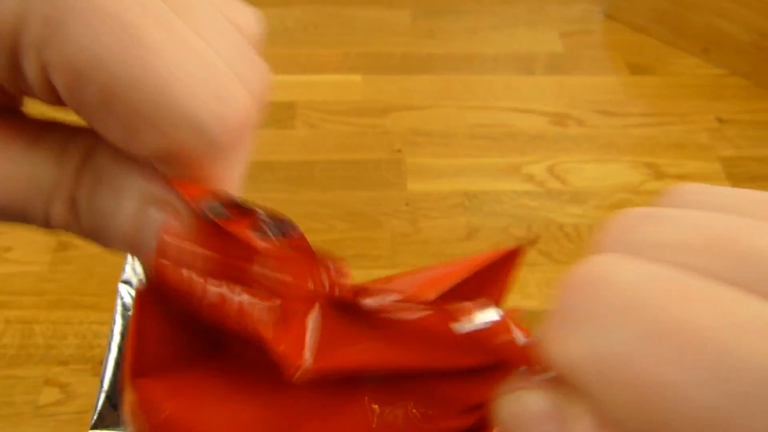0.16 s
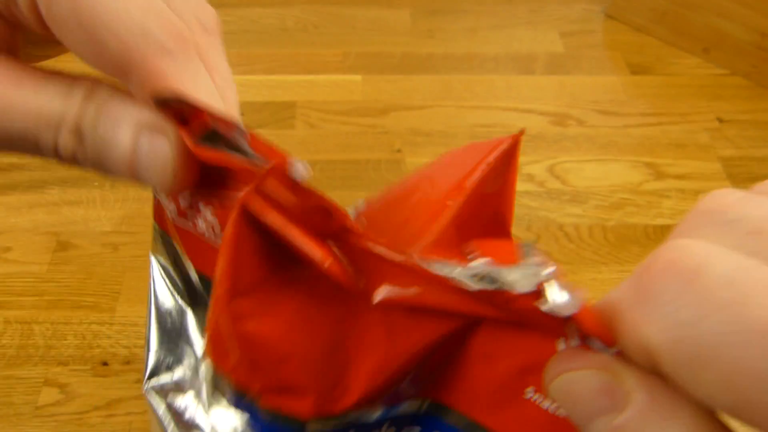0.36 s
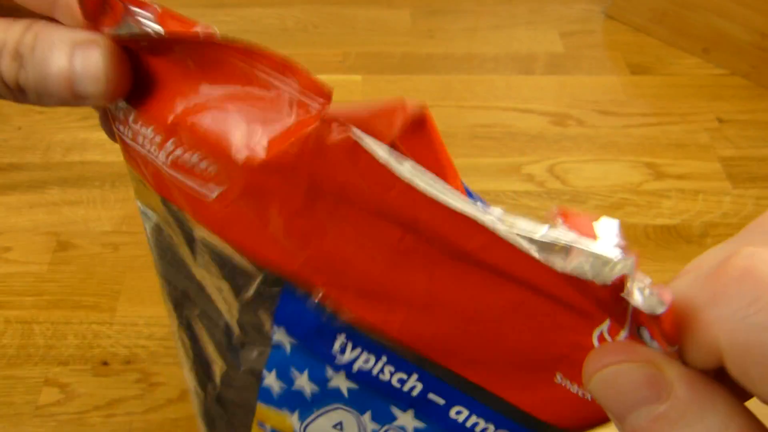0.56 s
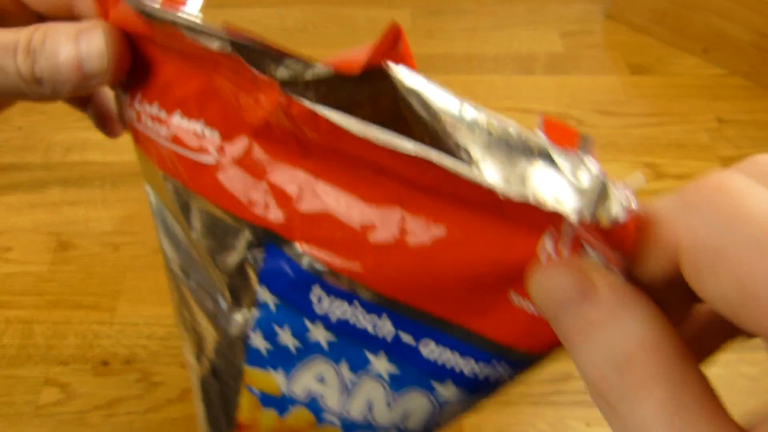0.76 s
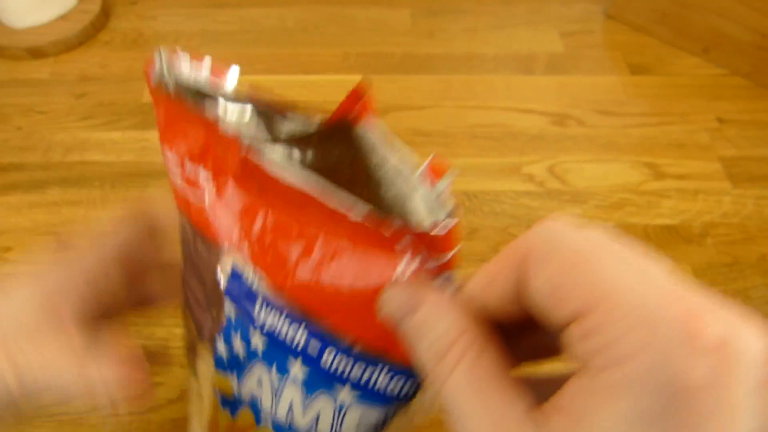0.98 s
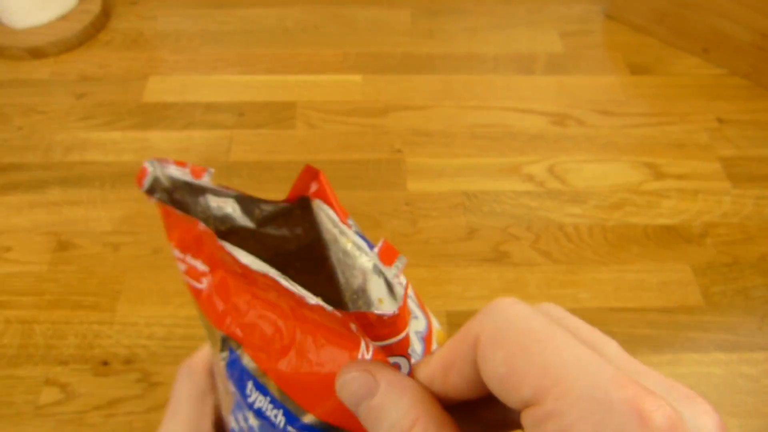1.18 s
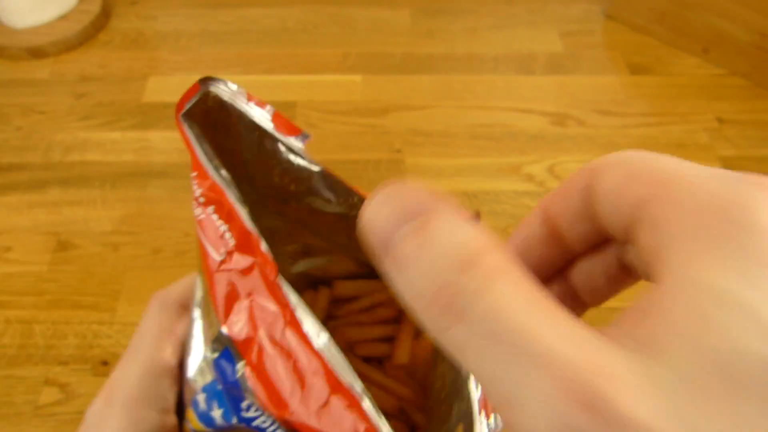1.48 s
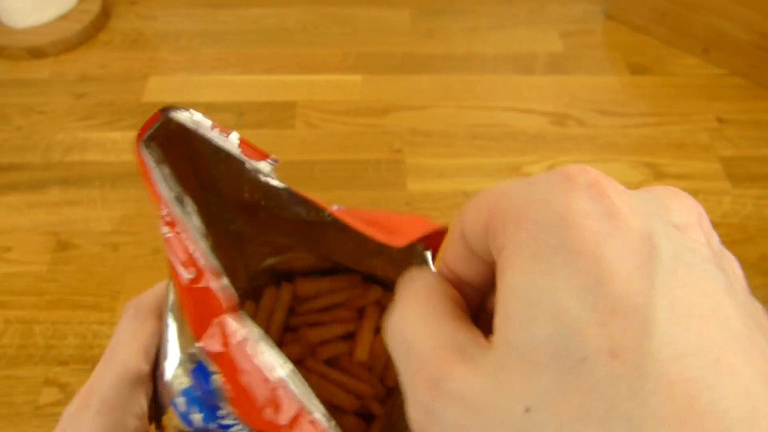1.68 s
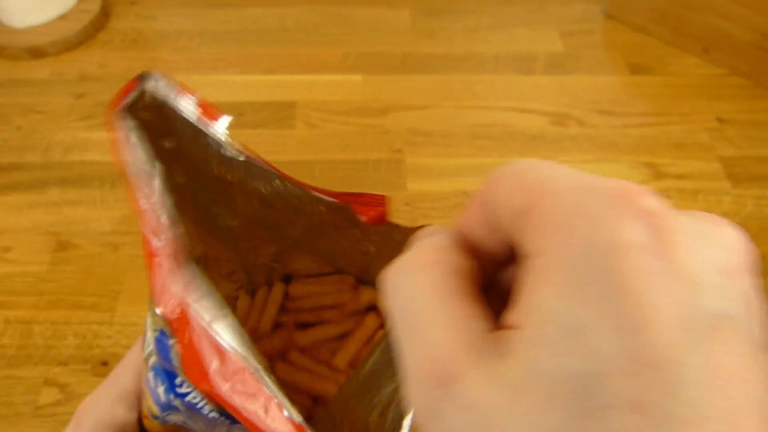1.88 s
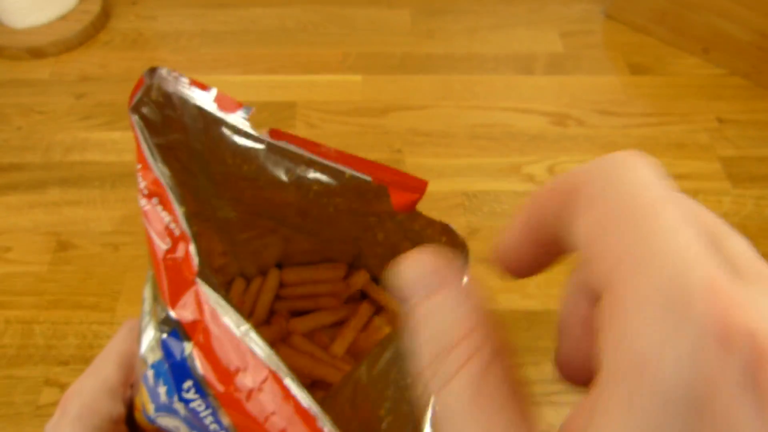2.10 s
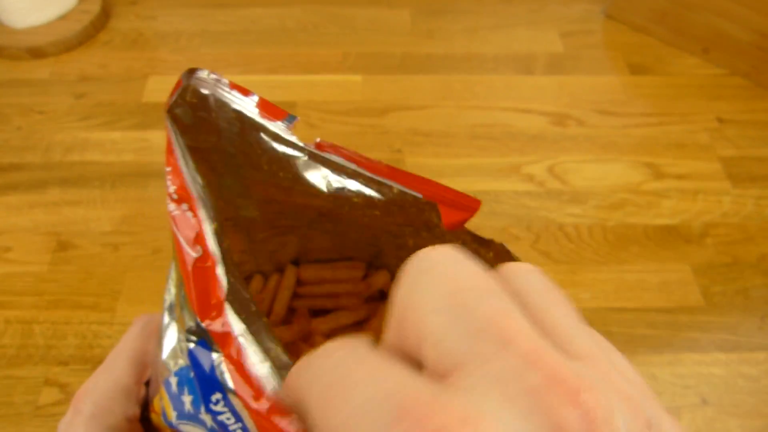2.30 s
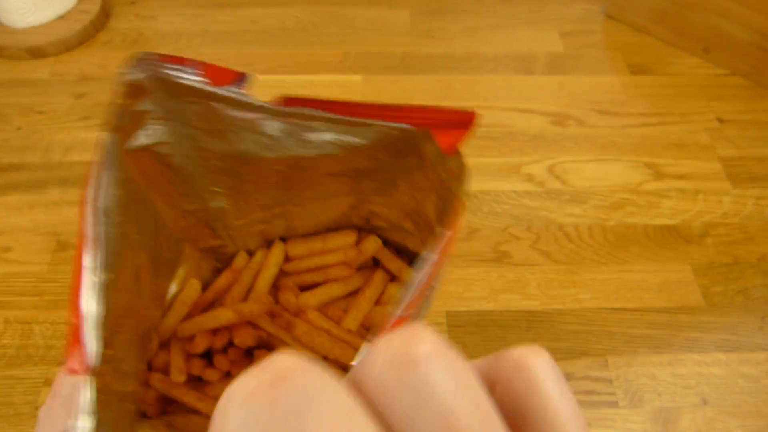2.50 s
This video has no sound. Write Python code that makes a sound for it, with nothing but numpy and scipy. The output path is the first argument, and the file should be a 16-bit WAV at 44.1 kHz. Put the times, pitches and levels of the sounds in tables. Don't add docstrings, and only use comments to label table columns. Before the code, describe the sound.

A metallised plastic snack bag is pulled open by hand, very close. From 0 to 0.7 s, hard bright snaps come in fast irregular clusters over crisp film crackle. From 0.75 to 1.3 s it is quieter, with scattered ticks. From 1.3 s a finer, hollow rustle swells, dips near 2.3 s, then snaps strongly at 2.4-2.6 s. Short small-room reflections and faint hiss.

```python
import sys
import numpy as np
from scipy import signal
from scipy.fft import rfft, irfft, next_fast_len
from scipy.io import wavfile
from scipy.ndimage import uniform_filter1d

SR = 44100
rng = np.random.default_rng(int(sys.argv[2]) if len(sys.argv) > 2 else 0)


def generate_wav(signal):
    frames = np.transpose(np.atleast_2d(signal))
    scaled = np.clip(frames, -1, 1) * 32767
    pcm = np.round(scaled).astype(np.int16)
    wavfile.write(sys.argv[1], SR, pcm)


def convert_level_to_amplitude(level_db):
    exponent = np.asarray(level_db, float) / 20
    return 10 ** exponent


N = 116865
ECHO_S = 0.0036

# [t/s, peak level/dB, f/Hz, after-crackle level/dB]
TEAR_SNAPS = [(0.0095, -2.9, 7560, -29), (0.0524, -8.3, 5200, -27), (0.1369, -10.7, 7710, -30),
              (0.1509, -7.3, 7770, -29), (0.1632, -10.1, 3600, -25), (0.1714, -3.2, 6270, -24),
              (0.189, -2.5, 7440, -21), (0.2095, -3.6, 4200, -27), (0.2332, -3.1, 4600, -21),
              (0.2519, -2.2, 6710, -25), (0.2796, -11.8, 3280, -29), (0.2904, -8.4, 4590, -28),
              (0.3188, -12.9, 7860, -30), (0.4234, -5.0, 6280, -25), (0.4272, -5.9, 6000, -28),
              (0.4609, -2.7, 7490, -26), (0.5178, -5.9, 6150, -26), (0.5266, -7.3, 5830, -30),
              (0.5871, -0.8, 7220, -25), (0.6738, -10.4, 6730, -26), (0.6896, 0.6, 7800, -20),
              (0.7687, -15.0, 7910, -37), (0.8354, -17.0, 6090, -38), (0.8594, -18.4, 8520, -34),
              (0.8707, -13.1, 5920, -31), (0.9066, -7.8, 6450, -27), (0.9775, -8.7, 6900, -28),
              (0.9808, -10.4, 6370, -31)]
# [t/s, peak level/dB, f/Hz, after-crackle level/dB]
OPEN_SNAPS = [(1.0815, -20.1, 6940, -40), (1.1421, -13.1, 6620, -28), (1.1495, -9.8, 7070, -30),
              (1.188, -15.3, 8180, -33), (1.2673, -20.7, 2890, -33), (1.4602, -12, 6430, -26),
              (1.5715, -17.2, 7870, -35), (1.6186, -19.3, 6920, -42), (1.7086, -15.0, 6330, -33),
              (1.8029, -8.7, 6290, -26), (1.9376, -10.4, 5890, -29), (1.9892, -8.8, 4530, -24),
              (2.0442, -10.1, 6410, -29), (2.0778, -10.5, 6440, -28), (2.0983, -10.3, 6380, -29),
              (2.1724, -10.8, 5010, -24), (2.2955, -24.6, 5980, -39), (2.3229, -26.7, 6720, -47),
              (2.4099, -12.0, 5610, -25), (2.4391, -3.7, 6680, -24), (2.4824, -6.4, 5960, -22),
              (2.6059, -7.9, 5580, -23), (2.6265, -10.5, 6160, -30)]
# [f/Hz, level/dB per Hz]
FILM = [(100, -29), (500, -24), (1000, -15.5), (2300, -7.5), (5000, -2), (7800, 1.5), (10500, -9),
        (16000, -28)]
# [f/Hz, level/dB per Hz]
HOLLOW = [(70, -30), (130, -10.5), (300, -10), (700, -5.5), (1200, 3.5), (2500, 1), (4000, -4.5),
          (9000, -17)]
# [t/s, hollow share level/dB]
OPENING = [(0, -13.5), (.45, -8), (.69, -11), (.75, -14.5), (.8, -6), (1.05, -7), (1.12, -1.5), (1.3, -3),
           (1.7, -2), (2.2, -5), (2.65, -4)]


def snaps():
    length, cycles = 2500, 2.1
    out, t = np.zeros(N + SR), np.arange(length) / SR
    rows = np.vstack([TEAR_SNAPS, OPEN_SNAPS])
    draws = rng.random((len(rows), length + 2))
    noise = rng.standard_normal((len(rows), length))
    for (s, db, hz, after_db), draw, sizes in zip(rows, draws, noise):
        crack = grain(hz, cycles, draw[0])
        top = np.argmax(abs(crack))

        hits = (draw[2:] < 7000 / SR) * np.tanh(sizes)
        hits = hits * np.exp(-(t / 0.0061) ** 2) * (t > 4 / hz)
        hits = hits * (1 - 0.5 * np.exp(-(t / ECHO_S) ** 4))
        ringing = 1.22 * evened(np.convolve(hits, grain(hz, 1.49, draw[1]))[:length])
        film = evened(colour(hits, FILM))
        hollow = convert_level_to_amplitude(np.interp(s, *np.transpose(OPENING))) * evened(colour(hits, HOLLOW))
        after = ringing + film + hollow
        sound = convert_level_to_amplitude(after_db - 3.5) * after / abs(after[:500]).mean()

        sound[:len(crack)] += convert_level_to_amplitude(db + 1.0) * crack / abs(crack).max()
        second = grain(hz * (0.5 + draw[1] * 0.5), cycles, draw[1])
        sound[20:20 + len(second)] += convert_level_to_amplitude(db - 5) * second / abs(second).max()
        sound[top - 1:top + 2] += convert_level_to_amplitude(db - 14) * np.array([0.5, -1, 0.5])
        start = round(s * SR) - top
        out[start:start + length] += sound
    return out[:N]


# [t/s, peak level/dB, f/Hz]
TICKS = [(0.0166, -13.0, 5960), (0.0506, -11.0, 6740), (0.0578, -12.0, 4170), (0.14, -11.0, 7120),
         (0.1418, -13.0, 7560), (0.1476, -9.0, 7740), (0.2371, -7.0, 6590), (0.2555, -10.0, 7040),
         (0.2859, -11.0, 5400), (0.3699, -15.0, 4280), (0.3907, -13.0, 5600), (0.4651, -13.0, 7310),
         (0.4678, -9.0, 6750), (0.4907, -12.0, 5550), (0.4982, -13.0, 4730), (0.544, -14.0, 6300),
         (0.5471, -12.0, 6360), (0.5902, -9.0, 7990), (0.6229, -12.0, 6090), (0.6251, -6.0, 7390),
         (0.6805, -9.0, 7140), (0.6932, -7.0, 7390), (0.7424, -23.0, 7930), (0.7722, -20.0, 5980),
         (0.7949, -24.0, 7770), (0.8234, -26.0, 5980), (0.8392, -22.0, 5460), (0.8632, -21.0, 5270),
         (0.8733, -16.0, 5860), (0.8976, -18.0, 5910), (0.91, -11.0, 7700), (0.913, -13.0, 7470),
         (0.9676, -17.0, 6820), (1.0541, -28.0, 6120), (1.0845, -24.0, 8060), (1.0867, -24.0, 6930),
         (1.2219, -21.0, 7000), (1.3356, -11.0, 5120), (1.4849, -15.0, 7480), (1.4995, -16.0, 7180),
         (1.5115, -17.0, 7250), (1.5383, -17.0, 4840), (1.5614, -17.0, 6360), (1.7059, -18.0, 3820),
         (1.7561, -16.0, 4930), (1.8565, -9.0, 7910), (1.8852, -13.0, 4230), (1.8989, -11.0, 5680),
         (1.993, -11.0, 6570), (2.2982, -28.0, 4620), (2.3001, -27.0, 6360), (2.3202, -29.0, 6500),
         (2.4874, -7.0, 6300), (2.4959, -10.0, 6530), (2.5101, -8.0, 6480), (2.5892, -18.0, 6930),
         (2.6083, -9.0, 5300), (2.6104, -8.0, 6870)]


def ticks():
    return place_grains(TICKS, cycles=2.3, gain_db=2)


# [t/s, peak level/dB, f/Hz]
POPS = [(.0096, -10.5, 3600), (.0487, -14, 3100), (.058, -33.5, 360), (.1408, -21.5, 1940),
        (.2, -29.5, 376), (.2902, -17, 1940), (.33, -23.5, 920), (.384, -29, 960), (.442, -32, 840),
        (.461, -24, 895), (.4911, -14, 1560), (.4995, -20, 895), (.6255, -14, 2450), (.6405, -18, 1840),
        (.68, -36, 376), (.945, -33, 990), (1.0971, -29.5, 1140), (1.462, -14, 2350), (1.6479, -29, 1160),
        (2.1768, -25, 1390), (2.1827, -45, 1410), (2.6093, -19, 1200)]


def pops():
    return place_grains(POPS, cycles=2.9, gain_db=0)


def place_grains(table, cycles, gain_db):
    out = np.zeros(N + SR)
    for s, db, hz in table:
        g = grain(hz, cycles, rng.random())
        start = round(s * SR) - np.argmax(abs(g))
        out[start:start + len(g)] += convert_level_to_amplitude(db + gain_db) * g / abs(g).max()
    return out[:N]


def grain(hz, cycles, phase):
    u = np.arange(int(4 * cycles * SR / hz) + 8) * hz / SR / cycles
    shape = u ** 2 * np.exp(-4 * u)
    g = shape * np.sin(2 * np.pi * (cycles * u * (1 - 0.0077 * u) + phase))
    g = g - shape * g.sum() / shape.sum()
    return g / np.linalg.norm(g)


# [t/s of the strongest moment, effort level/dB, half-length/s]
TUGS = [(.015, -28.5, 0.015), (.065, -34.5, 0.025), (.15, -25.5, 0.023), (.2, -17.5, 0.018),
        (.24, -21, 0.021), (.285, -25, 0.0088), (.32, -28.5, 0.03), (.385, -25, 0.016), (.432, -21, 0.0075),
        (.495, -27, 0.023), (.55, -28, 0.031), (.605, -27.5, 0.016), (.054, -24, 0.011),
        (.628, -22, 0.0096), (.655, -23.5, 0.0073), (.68, -23, 0.0043), (.73, -39, 0.024),
        (.795, -35, 0.013), (.9, -33, 0.015), (.935, -33.5, 0.014), (.968, -30.5, 0.0033),
        (1.02, -37, 0.023)]
# [t/s of the strongest moment, effort level/dB, half-length/s]
SPREADS = [(1.105, -33, 0.014), (1.155, -28.5, 0.021), (1.194, -34, 0.034), (1.279, -32.5, 0.012),
           (1.334, -23, .02), (1.399, -23, 0.029), (1.455, -25, 0.015), (1.49, -27.5, 0.014),
           (1.533, -30, 0.015), (1.569, -34, 0.017), (1.649, -37.5, 0.0037), (1.697, -32.5, 0.011),
           (1.729, -30.5, 0.025), (1.821, -22.5, 0.037), (1.845, -20.5, .012), (1.911, -23, 0.022),
           (1.997, -24, 0.032), (2.029, -25, 0.029), (2.093, -27.5, 0.02), (2.153, -33.5, 0.053),
           (2.183, -21, 0.0071), (2.3, -37.5, 0.0024), (2.327, -35, 0.0029), (2.388, -41.5, 0.014),
           (2.412, -22.5, 0.0077), (2.453, -23.5, 0.028), (2.497, -22, 0.023), (2.535, -30.5, 0.012),
           (2.574, -30, 0.019), (2.617, -24.5, 0.01)]
# [f/Hz, width/Hz, level/dB]
BAG_AIR = [(766, 266, 5), (1130, 34, -16), (1420, 18, 1), (3970, 130, 8)]


def handling():
    t = np.arange(N) / SR
    coarse = t[::32]
    s, db, half = np.vstack([TUGS, SPREADS]).T[:, :, None]
    u = (coarse - s) / np.where(coarse < s, 0.92 * half, half)
    power = (convert_level_to_amplitude(db) ** 2 * np.exp(-u ** 2)).sum(0) + convert_level_to_amplitude(-48.5) ** 2
    effort = np.interp(t, coarse, np.sqrt(power))

    film = evened(crackle(7000, 2.3, 1.86, 307, 13340, FILM))
    body = crackle(2500, 2.5, 1.04, 89.5, 6400, HOLLOW)
    air = sum(convert_level_to_amplitude(level) * resonate(body, hz, width) for hz, width, level in BAG_AIR)
    hollow_share = convert_level_to_amplitude(np.interp(t, *np.transpose(OPENING)))
    return effort * (film + hollow_share * evened(body + air))


def crackle(per_s, spread_db, cycles, lo_hz, hi_hz, points):
    draw, size, pick = rng.random(N), rng.exponential(1, N), rng.integers(0, 30, N)
    slow = uniform_filter1d(rng.standard_normal(N), size=300)
    clumps = evened(uniform_filter1d(slow, size=300))
    is_open = np.arange(N) > 1.1 * SR
    spread = spread_db * np.where(is_open, 0.53, 1)
    struck = draw < per_s / SR * np.where(is_open, 1.4, 1)
    clicks = struck * convert_level_to_amplitude(spread * np.minimum(size, 4) + 1.5 * clumps)
    out = np.zeros(N)
    for k, hz in enumerate(np.geomspace(lo_hz, hi_hz, 30)):
        ring = signal.oaconvolve(clicks * (pick == k), grain(hz, cycles, rng.random()))[:N]
        out += np.sqrt(hz) * ring
    return colour(out, points)


def room(x):
    t, slot = np.arange(600) / SR, np.arange(N) / 900
    mid, other = x.copy(), np.zeros(N)
    for k in range(12):
        part = x * np.maximum(1 - abs((slot - k + 6) % 12 - 6), 0)
        echo = rng.standard_normal(600) * np.exp(-((t - ECHO_S) / 0.0011) ** 2)
        path = convert_level_to_amplitude(-6.5) * tail(0.91)
        path[:600] += convert_level_to_amplitude(-7) * echo / np.linalg.norm(echo)
        mid += signal.fftconvolve(part, path)[:N]
        other += signal.fftconvolve(part, tail(0.18))[:N]
    return 0.84 * mid, other


# [f/Hz, t60/s]
ROOM = [(200, 0.39), (2000, 0.22), (5000, 0.21), (12000, 0.14)]


def tail(shorten):
    size = SR // 3
    taps = np.zeros(size)
    taps[np.arange(200, size - 10, 10) + rng.integers(0, 10, (size - 201) // 10)] = 1
    hz, t, z = signal.stft(taps * rng.choice([-1., 1.], size), SR, nperseg=256)
    decay = convert_level_to_amplitude(-60 * t / (shorten * read(ROOM, hz)[:, None]))
    out = signal.istft(z * decay, SR, nperseg=256)[1]
    return out / np.linalg.norm(out)


# [f/Hz, left-right likeness 0..1]
SAME = [(60, 1), (180, 0.93), (550, 0.85), (1650, 0.83), (4970, 0.82), (15000, 1)]
# [f/Hz, left minus right level/dB]
LEAN = [(60, -6), (240, 2.5), (950, 1.5), (3770, 0.5), (15000, 2)]


def ports(mid, other):
    size = next_fast_len(N)
    hz = np.fft.rfftfreq(size, 1 / SR)
    same = np.clip(read(SAME, hz), 0.05, 0.999)
    side = np.sqrt((1 - same) / (1 + same)) * rfft(other, size)
    lean = convert_level_to_amplitude(read(LEAN, hz) / 2)
    m = rfft(mid, size)
    left = irfft((m + side) * lean, size)[:N]
    right = irfft((m - side) / lean, size)[:N]
    return np.array([left, right])


# [f/Hz, level/dB per Hz]
HUSH = [(20, 22), (60, 16.5), (150, 4), (500, 11), (3000, -27), (15000, -4)]


def hush():
    a, b = (evened(colour(rng.standard_normal(N), HUSH)) for _ in "lr")
    return convert_level_to_amplitude(-60.5) * np.array([a + 0.99 * b, a - 0.98 * b])


def evened(x):
    return x / np.sqrt(np.mean(x ** 2) + 1e-20)


def read(points, hz):
    f, value = np.transpose(points)
    return np.interp(np.log(hz + 1), np.log(f + 1), value)


def colour(x, points):
    log_gain = np.log(convert_level_to_amplitude(read(points, abs(np.fft.fftfreq(4096, 1 / SR)))))
    phase = -signal.hilbert(log_gain).imag
    taps = np.fft.ifft(np.exp(log_gain + 1j * phase)).real[:2048]
    return signal.oaconvolve(x, taps)[:len(x)]


def resonate(x, hz, width):
    return signal.lfilter(*signal.iirpeak(hz, hz / width, SR), x)


def scene():
    bag = handling() + snaps() + pops() + ticks()
    return ports(*room(bag)) + hush()


def roll_off(x):
    return signal.sosfilt(signal.butter(12, 16820, fs=SR, output="sos"), x)


def record(dry):
    thin = signal.sosfilt(signal.butter(2, 110, "high", fs=SR, output="sos"), dry)
    band_limit = signal.firwin(255, 16300, window=("kaiser", 9), fs=SR)
    cut = signal.oaconvolve(thin, band_limit[None], "same")
    return roll_off(np.clip(cut, -1, 1))


dry = scene()
out = record(dry)
generate_wav(out)
```